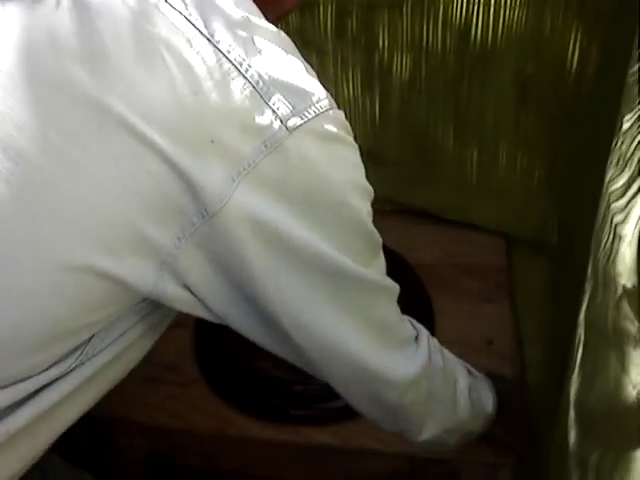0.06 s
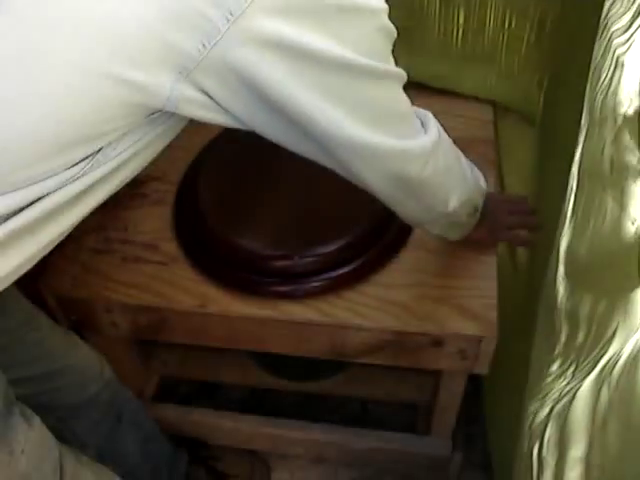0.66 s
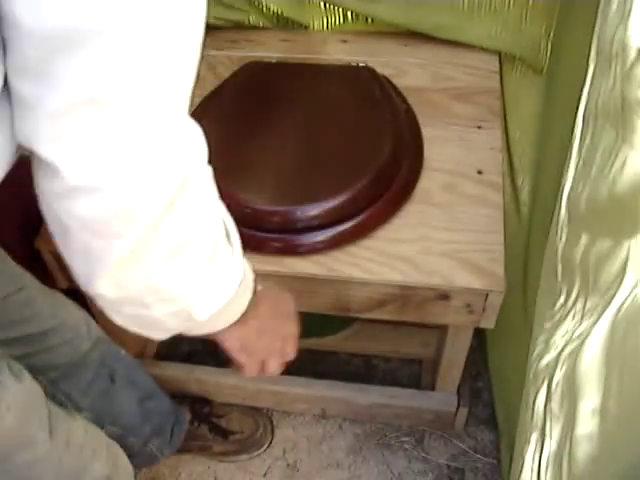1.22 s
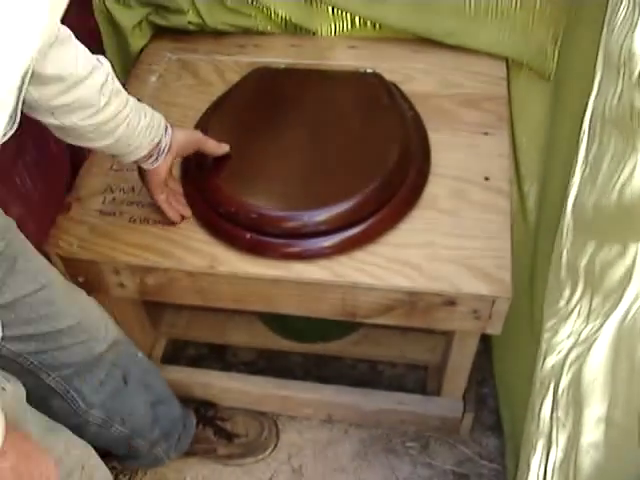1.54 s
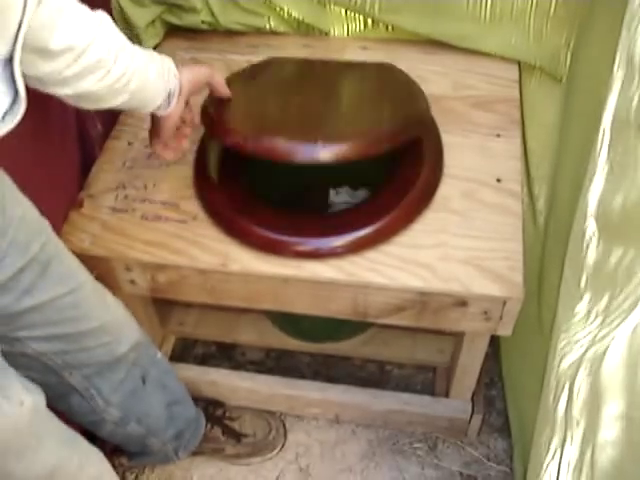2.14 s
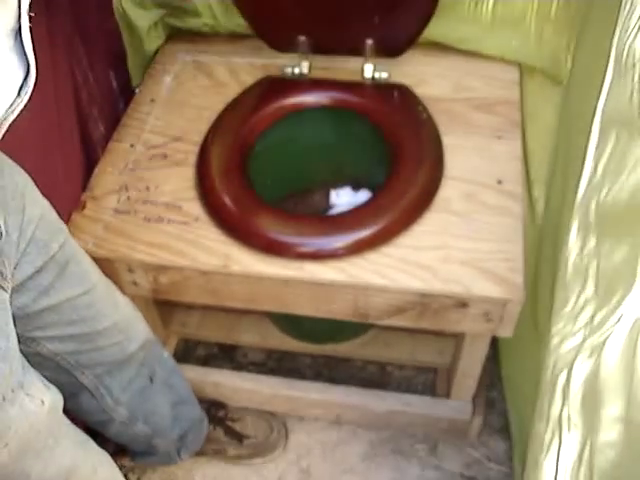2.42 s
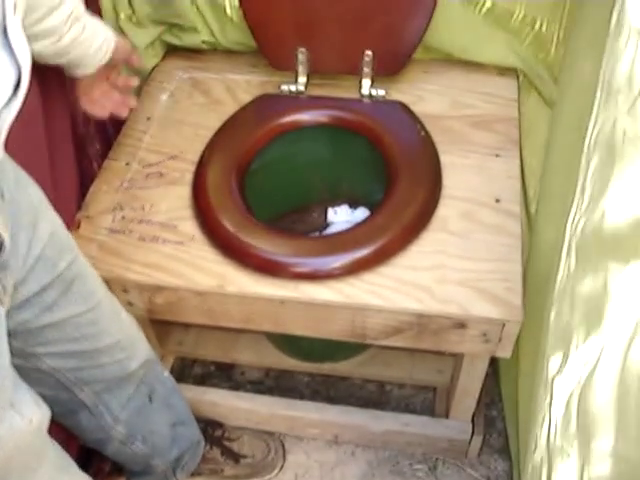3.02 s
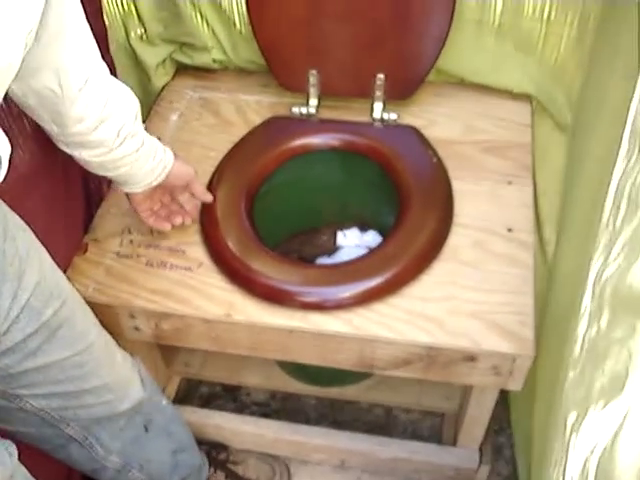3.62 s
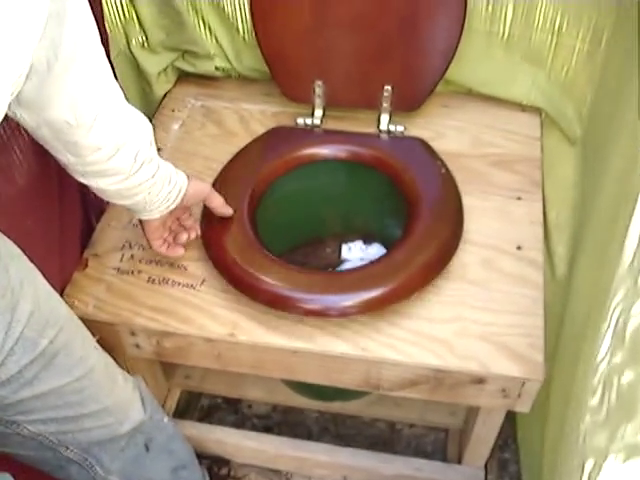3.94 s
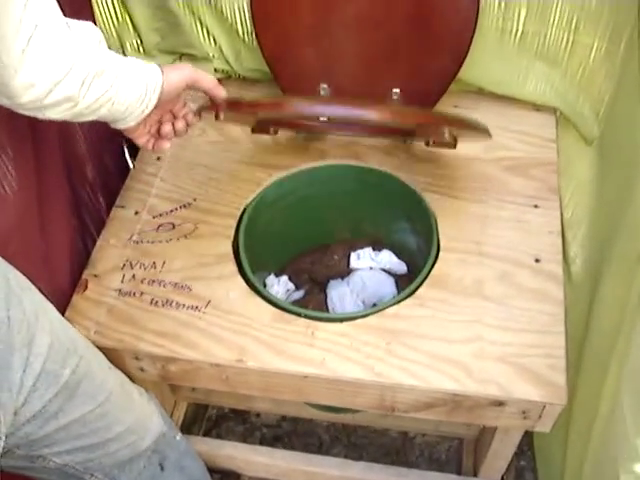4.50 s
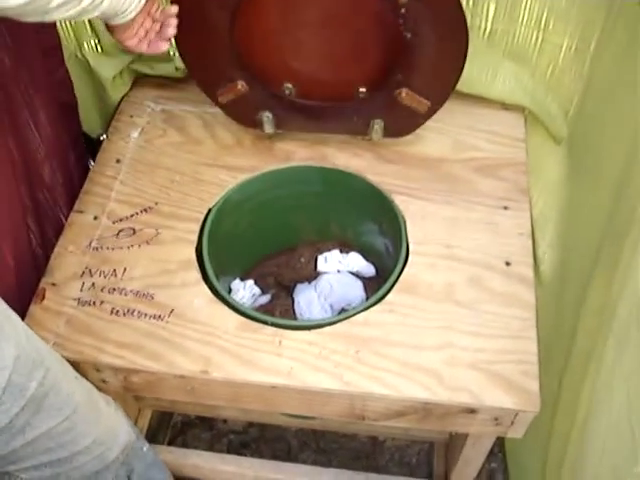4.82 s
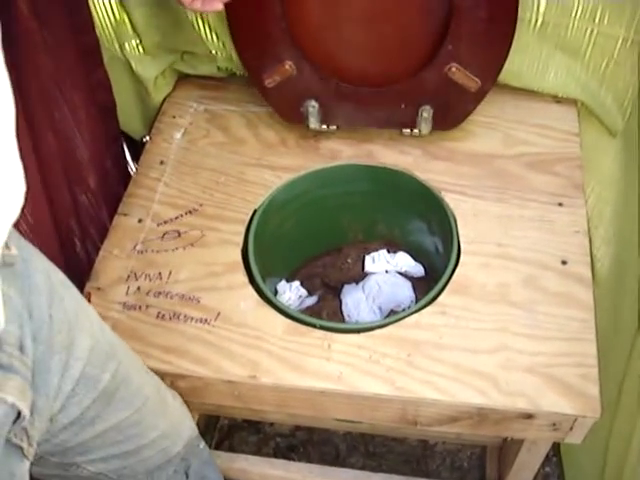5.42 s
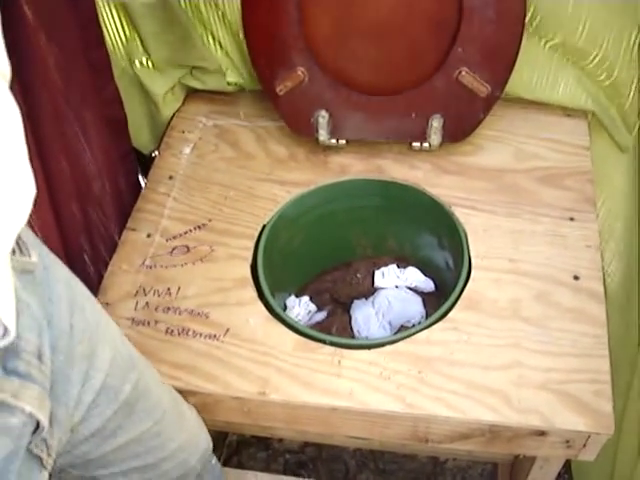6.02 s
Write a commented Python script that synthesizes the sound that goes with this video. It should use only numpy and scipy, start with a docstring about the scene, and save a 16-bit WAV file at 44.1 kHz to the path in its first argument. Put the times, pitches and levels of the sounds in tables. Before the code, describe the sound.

A soft, steady outdoor hush runs throughout, with almost no echo. In the first 0.6 seconds a hollow plywood box bumps and rocks several times, with light sleeve swishes. At about 0.8 seconds comes the loudest knock, briefly overloading the microphone, with quick rattling rebounds and a gritty grind from the joints. A small metal click follows. Faint bumps come at 1.4 and 2.1 seconds, and a faint, distant low drone rises near 1.9 seconds and fades. At 2.9 seconds a wooden toilet lid hits its rest with a sharp clack and a short hinge buzz. A sleeve rubs with a faint squeak around 3.5 seconds, and a soft bump follows at 4. The metal hinges click at 4.4 seconds and more faintly at 4.7. Near 6 seconds the heavier wooden seat brushes the lid, then lands with a round knock and settles with a tiny tick.

```python
"""Outdoors, in a half-open shelter: a wooden toilet seat on a hollow plywood box.
Someone leans on the box; it bumps, rocks and grinds at the joints. Lid and seat are raised:
the metal hinges stick and slip in clicks, and each leaf knocks against its rest.
A sleeve swishes over a steady hush and a faint, fading drone. The microphone clips on the hardest bump."""
import sys
import numpy as np
from scipy import signal
from scipy.fft import rfft, irfft, next_fast_len
from scipy.io import wavfile
from scipy.ndimage import map_coordinates

SR = 44100
rng = np.random.default_rng(int(sys.argv[2]) if len(sys.argv) > 2 else 0)


def dump_mix(stems):
    """Bounce the given channels to the path in sys.argv[1] as a 16-bit WAV at rate SR."""
    frames = np.atleast_2d(stems).T  # one column per channel
    limited = np.clip(frames, -1, 1)  # hard clip at full scale
    pcm = np.round(limited * 32767).astype(np.int16)
    wavfile.write(sys.argv[1], SR, pcm)


N = 276110
TIME_S = np.arange(N) / SR
RING_S = np.arange(SR // 3) / SR  # time after a blow

# noise spectra: freq_hz, relative_db
AIR_SPECTRUM = [(12, -28.5), (20, -1.5), (70, -4), (108, -5), (182, -0.5), (368, -1), (398, -2), (477, -2),
                (914, -5), (1500, -10.5), (2590, -13.5), (3270, -16), (5640, -20), (7910, -23.5),
                (10000, -28.5), (13000, -83.5), (22000, -120)]
CLOTH_SPECTRUM = [(200, -39.5), (800, 1), (1600, 6), (3200, -0.5), (5000, -7), (10000, -47.5)]
GRIT_SPECTRUM = [(300, -25), (1200, -10.5), (2800, 8), (4500, -2), (10000, -23.5)]
# outdoor air contour: time_s, relative_db
HUSH_CONTOUR = [(0.0, -42), (0.45, -41), (1.08, -45), (1.8, -43.5), (6.26, -43)]
# sleeve slides and squeaky rubs: centre_s, half_length_s, level_db
SLEEVE_SWISHES = [(.13, 0.198, -45.5), (.345, .05, -42.5), (.65, 0.21, -55), (3.47, 0.113, -52),
                  (4.0, 0.18, -54)]
SLEEVE_RUBS = [(3.38, 0.0116, -54.5), (3.44, 0.031, -47.5), (3.56, 0.023, -51.5)]
# squeak resonances: centre_hz, half_width_hz, relative_db
SQUEAK_PEAKS = [(1654, 40, 4), (2710, 108, -5.5), (3070, 98, -9.5), (3310, 91, -11.5)]

# bumps on the box: start_s, force_db, brightness_hz, rebounds (rounded; none if negative)
BOX_BUMPS = [(.017, -18, 623, 0), (.2, -28, 1000, 2), (.3003, -10.5, 543, 1), (.341, -14.5, 1285, 0.5),
             (.351, -14, 1090, 0), (.37, -11.5, 945, 2), (.411, -14.5, 290, 0), (.524, -29.5, 1696, -0.5),
             (.541, -27, 330, 0), (.558, -23.5, 319, 1), (.762, -13, 1400, 0), (.772, 3, 3294, 0),
             (.79, -15, 2200, 0), (.796, -2.5, 1757, 5), (.928, -24.5, 2820, -1), (1.372, -31.5, 444, 0.5),
             (2.118, -32.5, 378, -0.5), (3.984, -26.5, 290, 0)]
# hinge slip bursts: start_s, force_db, brightness_hz, slips, gap_s
HINGE_BURSTS = [(.9275, -25.5, 7300, 3, .0034), (2.912, -33.5, 9100, 1, 0.0025),
                (4.3955, -24.5, 7400, 3, 0.00434), (4.707, -34.5, 4500, 3, .0075),
                (6.062, -43, 7100, 1, 0.0028)]
# lid meets its rest: start_s, force_db, brightness_hz
LID_BLOWS = [(2.8975, -34, 9000), (2.8993, -17, 7200), (2.9085, -41, 600)]
# seat brushes the lid, falls back on it, settles: start_s, force_db, brightness_hz
SEAT_BLOWS = [(5.839, -29.5, 700), (5.972, -10, 3590), (5.9825, -5.5, 261), (6.007, -18, 276)]

# distinct modes: pitch_hz, relative_db, t60_s
BOX_MODES = [(120.9, -15.5, 0.215), (192.2, -13, 0.095), (208.7, -13, 0.215), (239.7, -5.5, 0.0863),
             (275.8, -7.5, 0.0868), (349.4, -11.5, 0.105), (413.2, -13, 0.0754), (520, -11.5, 0.057),
             (643.6, -11, 0.066), (703, -7, 0.042), (737, -14.5, 0.063), (808, -15, 0.014),
             (1178.2, -9, 0.0313), (1226.5, -21.5, 0.04), (1302, -22.5, 0.042), (1498.3, -20.5, 0.053),
             (2712, -16.5, 0.022)]
HINGE_MODES = [(2753, -8, 0.0182), (3408, -15, 0.0194), (4010, -11, 0.043), (4803, -8, 0.018),
               (4545, -11.5, 0.014), (6000, 0, 0.014), (7080, -20.5, 0.018), (8530, -8, 0.014)]
LID_MODES = [(157, -14.5, 0.107), (359.3, -9, 0.127), (579.8, -7.5, 0.084), (1254, -13.5, 0.0515),
             (1307, -10.5, 0.038), (1834, -10.5, 0.0484), (2128, -11.5, 0.038), (2404, -4.5, 0.049),
             (3166, -5.5, 0.028), (3660, -13.5, 0.038), (4100, -15, 0.041)]
SEAT_MODES = [(206.8, 2, 0.0678), (239.4, -1.5, 0.0576), (438, -3.5, 0.0716), (556.2, 4.5, 0.0602),
              (969, -10, 0.063), (1113, -12, 0.0734), (1390, -11, 0.067), (1561, -9, 0.03),
              (2057, -14, 0.035), (2117, -17, 0.017), (2493, -7, 0.0226), (3178, -13, 0.016),
              (3898, -21, .018)]
# dense modes between them: freq_hz, relative_db
PLYWOOD_SPECTRUM = [(30, -37.5), (80, -1.5), (200, 6.5), (400, 3), (780, 4), (1000, -10), (1300, -6.5),
                    (1900, -11.5), (3000, -17.5), (5000, -10.5), (10000, -20)]
METAL_SPECTRUM = [(100, -18), (1100, -7), (1800, -6.5), (2800, 1), (6000, 5.5), (10000, 3.5)]
HARDWOOD_SPECTRUM = [(80, -40), (300, -13), (700, 2.5), (1500, 0.5), (3000, 5.5), (5000, -5), (10000, -6)]
# dense mode decay: freq_hz, t60_s
PLYWOOD_DECAY = [(150, 0.127), (700, 0.106), (2000, 0.0514), (9000, 0.021)]
METAL_DECAY = [(500, 0.0182), (9000, 0.0125)]
HARDWOOD_DECAY = [(200, 0.077), (1500, 0.0244), (9000, 0.0383)]


def amp(db):
    """Decibels to gain."""
    return 10 ** (np.asarray(db) / 20)


def unit_rms(x):
    """Scale to rms 1."""
    return x / np.sqrt(np.mean(x ** 2) + 1e-20)


def at_freq(points, hz):
    """Interpolate (freq_hz, value) rows on a log axis."""
    freq_hz, values = np.transpose(points)
    return np.interp(np.log(hz + 1), np.log(freq_hz + 1), values)


def filtered(x, response):
    """Zero-phase filter with gain response(hz)."""
    size = next_fast_len(len(x) + 8192)
    return irfft(rfft(x, size) * response(np.fft.rfftfreq(size, 1 / SR)), size)[:len(x)]


def coloured(x, spectrum):
    """Shape x by a spectrum; rms 1."""
    return unit_rms(filtered(x, lambda hz: amp(at_freq(spectrum, hz))))


def noise(spectrum, size):
    """Coloured noise, rms 1."""
    return coloured(rng.standard_normal(size), spectrum)


def narrow_noise(peaks):
    """Noise in narrow resonances, rms 1."""
    def gain(hz):
        return sum(amp(db) / (1 + ((hz - centre_hz) / half_hz) ** 2) for centre_hz, half_hz, db in peaks)
    return unit_rms(filtered(rng.standard_normal(N), gain))


def wobble(rate_hz):
    """Smooth curve through random knots."""
    return map_coordinates(rng.standard_normal(512), [TIME_S * rate_hz], mode="wrap")


def swells(rows):
    """Sum of bell-shaped envelopes."""
    return sum(amp(db) * np.exp(-((TIME_S - centre_s) / half_s) ** 2) for centre_s, half_s, db in rows)


def add(track, start_s, sound):
    """Mix a sound into the track."""
    part = track[round(start_s * SR):][:len(sound)]
    part += sound[:len(part)]


def dense_ring(spectrum, decay):
    """Overlapping modes: noise with a decay time per frequency."""
    hz, age_s, bins = signal.stft(noise(spectrum, len(RING_S)), SR, nperseg=256)
    fade = amp(-60 * age_s / at_freq(decay, hz)[:, None])
    return signal.istft(bins * fade, SR)[1][:len(RING_S)]


def struck(blows, modes, spectrum, decay, dense_db, dense_rise_s, build_cycles, low_cut_hz, thin_ratio):
    """Blows ring the modes at random strengths; soft contacts are dull, hard ones thin and bright."""
    track = np.zeros(N)
    pitch_hz, mode_db, t60_s = np.transpose(modes)[:, :, None]
    partials = amp(mode_db - 60 * RING_S / t60_s) * np.sin(2 * np.pi * pitch_hz * RING_S)
    partials *= 1 - np.exp(-pitch_hz * RING_S / build_cycles)  # low modes build slower
    dense_gain = amp(dense_db) * (1 - np.exp(-RING_S / dense_rise_s))
    for start_s, force_db, brightness_hz in blows:
        ring = amp(rng.standard_normal(len(modes))) @ partials
        ring += dense_gain * dense_ring(spectrum, decay)
        ring = signal.lfilter(*signal.butter(2, brightness_hz, fs=SR), ring)
        ring = signal.lfilter(*signal.butter(1, thin_ratio * brightness_hz, "high", fs=SR), ring)
        add(track, start_s, amp(force_db) * ring)
    radiation = signal.butter(2, low_cut_hz, "high", fs=SR, output="sos")
    return signal.sosfilt(radiation, track)  # small panels radiate little bass


def hush(gain_db=-0.5183, waver_db=0.624):
    """Steady outdoor air, wavering slightly."""
    contour_db = np.interp(TIME_S, *np.transpose(HUSH_CONTOUR))
    return amp(contour_db + gain_db + waver_db * wobble(rate_hz=7)) * noise(AIR_SPECTRUM, N)


def sleeve():
    """Cloth slides unevenly as the arm moves, and briefly squeaks."""
    swish = swells(SLEEVE_SWISHES) * amp(wobble(rate_hz=40)) * noise(CLOTH_SPECTRUM, N)
    squeak = swells(SLEEVE_RUBS) * narrow_noise(SQUEAK_PEAKS)
    return swish + squeak


def rocking(period_s=0.0215, first_loss_db=9, next_loss_db=4, rest_hz=420, excess_kept=0.31):
    """The box rocks from leg to leg: bumps plus weakening rebounds, brightness tending to rest_hz."""
    contacts = []
    for start_s, force_db, brightness_hz, rebounds in BOX_BUMPS:
        contacts.append((start_s, force_db, brightness_hz))
        for k in range(1, round(rebounds) + 1):
            loss_db = first_loss_db + next_loss_db * (k - 1)
            rebound_hz = rest_hz + (brightness_hz - rest_hz) * excess_kept ** k
            contacts.append((start_s + k * period_s, force_db - loss_db, rebound_hz))
    return contacts


def box(contacts):
    """Hollow plywood booms and rattles at each contact."""
    return struck(contacts, BOX_MODES, PLYWOOD_SPECTRUM, PLYWOOD_DECAY, dense_db=-5.5,
                  dense_rise_s=0.000073, build_cycles=0.704, low_cut_hz=126, thin_ratio=0.207)


def joint_grind(contacts, gain_db=-28, db_per_force_db=0.664, lag_s=0.0045, half_s=0.00712):
    """The box joints grind in tiny random slips under each contact, less under dull ones."""
    knee_hz, slips_per_s = 1390, 1800
    loads = []
    for start_s, force_db, brightness_hz in contacts:
        dull_db = 20 * np.log10(min(brightness_hz / knee_hz, 1))
        loads.append((start_s + lag_s, half_s, gain_db + db_per_force_db * force_db + dull_db))
    slips = rng.standard_normal(N) * (rng.random(N) < slips_per_s / SR)
    return swells(loads) * coloured(slips, GRIT_SPECTRUM)


def clip_thump(centre_s=0.772, half_s=0.0037, level_db=-20):
    """One short low thump as the hardest bump overloads the microphone."""
    offset = (TIME_S - centre_s) / half_s
    return amp(level_db) * (1 - offset ** 2) * np.exp(-offset ** 2)


def hinges(loss_db_per_slip=2.5):
    """Pins stick and slip: bursts of evenly spaced clicks, strongest mid-burst."""
    clicks = []
    for start_s, force_db, brightness_hz, slips, gap_s in HINGE_BURSTS:
        for k in range(slips):
            loss_db = loss_db_per_slip * abs(k - (slips - 1) / 2)
            clicks.append((start_s + k * gap_s, force_db - loss_db, brightness_hz))
    return struck(clicks, HINGE_MODES, METAL_SPECTRUM, METAL_DECAY, dense_db=4.5,
                  dense_rise_s=0.00018, build_cycles=1.8, low_cut_hz=500, thin_ratio=0.17)


def drone(start_s=1.87, level_db=-51.5, rise_s=0.069, fade_db_per_s=13, pitch_hz=83.9, half_width_hz=6.9):
    """Distant low drone: quick rise, slow fade."""
    age_s = np.maximum(TIME_S - start_s, 0)
    envelope = amp(level_db - fade_db_per_s * age_s) * np.minimum(age_s / rise_s, 1)
    return envelope * narrow_noise([(pitch_hz, half_width_hz, 0)])


def lid():
    """The light lid hits its rest with a sharp clack."""
    return struck(LID_BLOWS, LID_MODES, HARDWOOD_SPECTRUM, HARDWOOD_DECAY, dense_db=-4,
                  dense_rise_s=0.00051, build_cycles=1.0, low_cut_hz=110, thin_ratio=0.016)


def hinge_buzz(start_s=2.905, level_db=-43, t60_s=0.44):
    """Loose hinges buzz briefly after the lid lands."""
    track = np.zeros(N)
    add(track, start_s, amp(level_db - 60 * RING_S / t60_s) * noise(METAL_SPECTRUM, len(RING_S)))
    return track


def seat():
    """The heavier seat ring hits the lid with a round knock."""
    return struck(SEAT_BLOWS, SEAT_MODES, HARDWOOD_SPECTRUM, HARDWOOD_DECAY, dense_db=-10.5,
                  dense_rise_s=0.0016, build_cycles=1.385, low_cut_hz=150, thin_ratio=0.0624)


def shelter(direct, t60_s=0.067, wet_db=-26.5):
    """Nearby surfaces add a faint, short scatter."""
    tail = rng.standard_normal(len(RING_S)) * amp(-60 * RING_S / t60_s)
    return direct + amp(wet_db) * signal.fftconvolve(direct, tail / np.linalg.norm(tail))[:N]


def scene():
    """Knocks in the shelter, over sleeve, drone and hush; mono."""
    contacts = rocking()
    thuds = box(contacts) + clip_thump() + seat() + joint_grind(contacts)
    clacks = lid() + hinges() + hinge_buzz()
    return (shelter(thuds + clacks) + sleeve() + drone() + hush())[None]


def record(dry):
    """The small microphone clips at full scale and passes nothing above its band limit."""
    band_limit_hz = 10150
    clipped = np.clip(dry[0], -1, 1)
    return filtered(clipped, lambda hz: hz < band_limit_hz)[None]


dry = scene()
out = record(dry)
dump_mix(out)
```